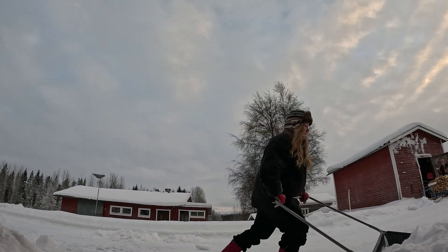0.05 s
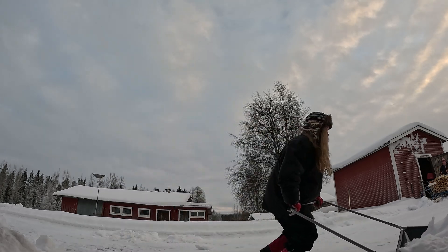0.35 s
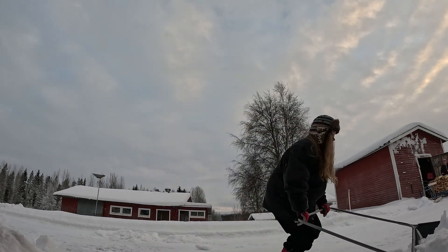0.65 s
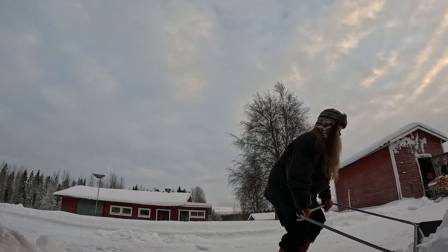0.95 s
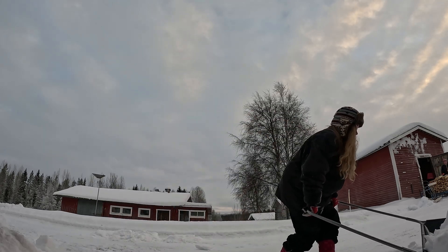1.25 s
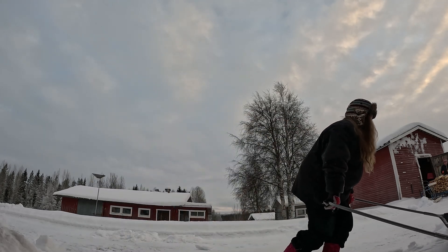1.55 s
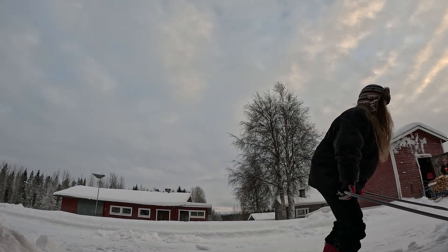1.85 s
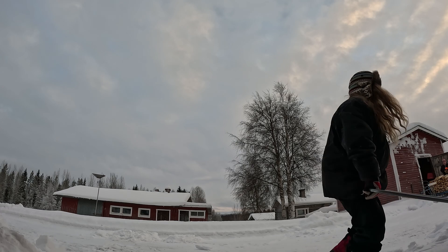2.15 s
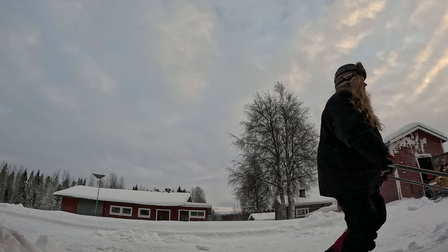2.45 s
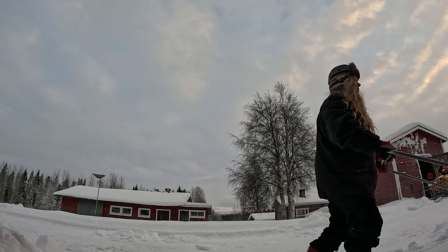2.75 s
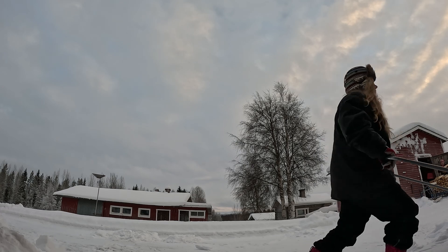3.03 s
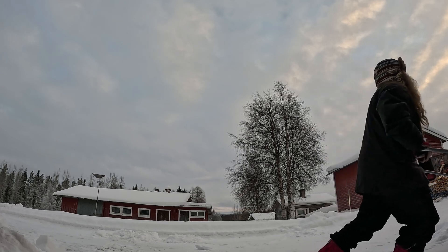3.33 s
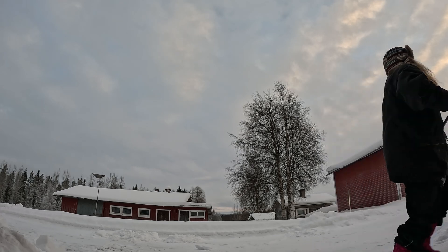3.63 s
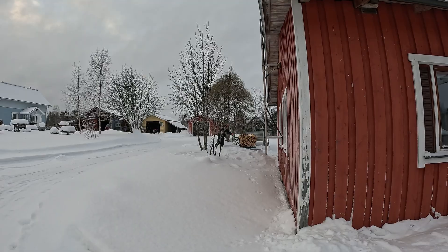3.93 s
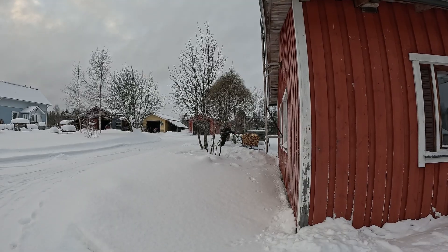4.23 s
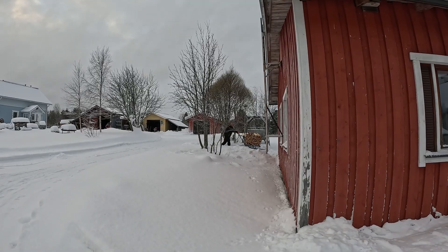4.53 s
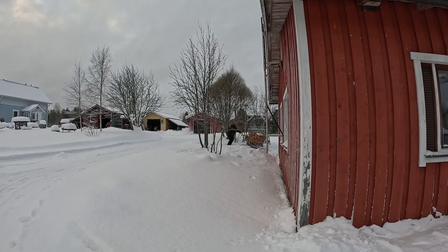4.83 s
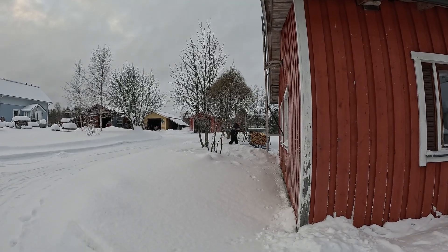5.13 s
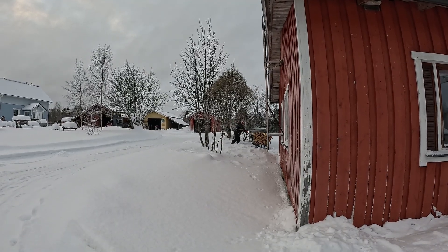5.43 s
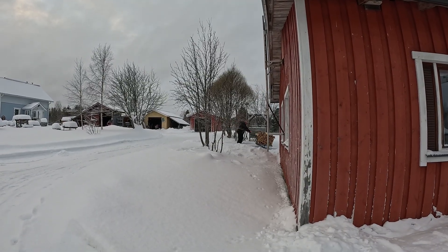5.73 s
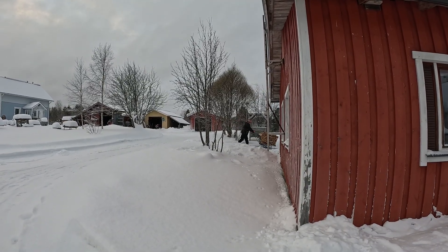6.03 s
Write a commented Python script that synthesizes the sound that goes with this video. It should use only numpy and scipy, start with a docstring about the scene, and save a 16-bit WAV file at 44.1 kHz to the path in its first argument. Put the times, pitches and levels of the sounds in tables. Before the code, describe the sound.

Close crunching shoves of a snow pusher with sharp knocks and boot thumps, then faint distant scraping and soft wind.

```python
"""In a snowy yard, a wide snow pusher is shoved over packed snow close by: it speeds up, then coasts.
With speed its edge crunches, its scoop rumbles and powder sprays. It bumps over lumps and knocks
against frozen ridges; its frame jolts once, boots thump in the snow and metal gives one small tink.
After a short, almost silent gap the pusher is far across the yard, a faint scrape under light wind
on the microphone."""
import sys
import numpy as np
from scipy import signal
from scipy.fft import rfft, irfft, next_fast_len
from scipy.io import wavfile
from scipy.ndimage import uniform_filter1d, map_coordinates

SR = 44100
rng = np.random.default_rng(int(sys.argv[2]) if len(sys.argv) > 2 else 0)


def int16_out(signal):
    """Quantize to a 16-bit WAV file."""
    q = np.round(np.clip(np.atleast_2d(signal).T, -1, 1) * 32767)
    wavfile.write(sys.argv[1], SR, q.astype(np.int16))


N = 276930

# the tones the blade rings with: (pitch [Hz], width [Hz], level [dB])
BLADE_TONES = [(597, 25, 1), (805, 66, 2), (978, 120, -3.5), (1173, 260, 0), (1598, 220, -1),
               (1800, 270, -2), (2500, 490, -6.5), (2950, 218, -1.5), (3680, 800, -16), (5110, 570, -6.5)]
# the hiss of spraying powder: (frequency [Hz], level [dB])
POWDER_COLOUR = [(7000, -41.5), (9500, -4.5), (11500, -4.5), (12500, -10.5), (13500, -22), (14400, -29)]
# the sound of cracking ice: (frequency [Hz], level [dB])
CRACK_COLOUR = [(150, -23), (500, 3.5), (1200, 2), (3000, -1), (6000, -7.5), (8500, -17.5), (11500, -14.5),
                (14000, -39)]
CATCH_S = 0.3763  # when the blade catches hard
FLEX_HZ = 299.2  # the scoop's thud on a ridge


def amp(db):
    """Turn decibels into a gain; amp(-60 * t / t60) fades by 60 dB in t60 seconds."""
    return 10 ** (np.asarray(db) / 20)


def unit(x):
    """Scale a signal to an average strength (rms) of 1."""
    return x / np.sqrt(np.mean(x ** 2) + 1e-20)


def colour(points):
    """A tone colour: gain at each frequency from (Hz, dB) points, falling steeply past both ends."""
    f, db = np.transpose(points)
    log_hz = np.log(np.r_[f[0] / 2, f, f[-1] * 2])
    return lambda hz: amp(np.interp(np.log(hz + 1), log_hz, np.r_[db[0] - 60, db, -120]))


def ringing(tones, hz):
    """How strongly a body with these ringing tones answers at each frequency."""
    return sum((-1) ** k * amp(db) * 1j * hz * width / (pitch ** 2 - hz ** 2 + 1j * hz * width)
               for k, (pitch, width, db) in enumerate(tones))


def curve(rows):
    """Join (time, value) points with straight lines, one value per sample."""
    return np.interp(np.arange(N) / SR, *np.transpose(rows))


def wobble(rate):
    """A smooth curve through `rate` random values a second."""
    return map_coordinates(rng.standard_normal(int(N * rate / SR) + 4), [np.arange(N) * rate / SR])


def filtered(x, response):
    """Turn each frequency of x up or down by response(hz)."""
    n = x.shape[-1]
    padded = next_fast_len(n + 8192)
    return irfft(rfft(x, padded) * response(np.fft.rfftfreq(padded, 1 / SR)), padded)[..., :n]


def add(track, s, sound):
    """Mix a sound into the track, starting at s seconds."""
    start = max(round(s * SR), 0)
    track[start:start + len(sound)] += sound[:N - start]


def noise(spectrum):
    """Steady noise with the given tone colour."""
    return unit(filtered(rng.standard_normal(N), colour(spectrum)))


def grains(spectrum, per_second, range_db):
    """A crunch made of countless tiny breaks of different sizes."""
    sizes = rng.standard_normal(N) * amp(-range_db * rng.random(N))
    breaks = rng.random(N) < per_second / SR
    return unit(filtered(sizes * breaks, colour(spectrum)))


def patchy(x, depth_db):
    """Narrow bands of the sound swell and fade at random as the contact shifts."""
    bands = signal.stft(x, nperseg=512)[2]
    swells = uniform_filter1d(rng.standard_normal(bands.shape), size=2, axis=0)
    swells = unit(uniform_filter1d(swells, size=16, axis=1))
    return unit(signal.istft(bands * amp(depth_db * swells), nperseg=512)[1][:N])


def shove(start, rise, hold, slowing_db_per_s):
    """Speed of one shove, 0 to 1: the pusher speeds up evenly, keeps its pace, then coasts."""
    t = np.arange(N) / SR - start
    return np.clip(t / rise, 0, 1) * amp(-slowing_db_per_s * np.maximum(t - rise - hold, 0))


def driven(shoves, layer_db, grows, creep_db=-22):
    """A layer gains `grows` dB for each dB of speed; between shoves the pusher still creeps."""
    speeds = np.maximum([shove(*row[:4]) for row in shoves], amp(creep_db))
    return np.max(amp(layer_db)[:, None] * speeds ** grows, axis=0)


def level_dip(length_s=0.0695, dip_db=8.5):
    """The scrape drops in level briefly after the frame's loud clack, in dB."""
    since_clack = np.arange(N) / SR - CATCH_S
    return -dip_db * np.interp(since_clack, [0, .008, length_s, length_s + .007], [0, 1, 1, 0])


def scrape():
    """The snow's crust breaks in clumps under the edge; every layer gets louder with speed."""
    # shoves close by: (start [s], rise [s], hold [s], slowing [dB/s],
    # edge [dB], drag [dB], rumble [dB], powder [dB])
    shoves = [(-0.2, 0.18, 0.058, 31, -32.5, -28.5, -30.5, -48),
              (0.12, 0.11, 0.13, 23.5, -35.5, -32.5, -29, -50), (1.16, 0.18, 0.1, 16, -31.5, -33, -32, -46),
              (1.807, 0.24, 0.14, 30.5, -30.5, -32, -31, -44.5),
              (2.656, .04, 0.037, 77.5, -38.5, -34, -36, -54.5),
              (3.023, 0.38, 0.06, 41, -31, -33, -32, -43.5),
              (3.731, 0.018, 0.032, 40, -31.5, -36.5, -37.5, -44)]
    # the crunch of the edge: (frequency [Hz], level [dB])
    edge_colour = [(710, -25), (1200, -1.5), (1370, -10.5), (1740, -3), (1910, -9.5), (3010, -2.5),
                   (4660, -4.5), (5070, -4), (7860, -13.5), (9000, -18), (11700, -40.5), (19800, -120)]
    # the gritty drag: (frequency [Hz], level [dB])
    drag_colour = [(260, -19.5), (450, 5), (684, -5), (877, 0.5), (1360, -8), (1460, -2.5), (1590, -18.5),
                   (2000, -6.5), (2600, -9.5), (4400, -120)]
    # the rumble of the scoop: (frequency [Hz], level [dB])
    rumble_colour = [(20, -35.5), (45, -12.5), (90, -5), (135, -3), (200, 0), (280, 2), (390, -1.5),
                     (520, -7.5), (700, -7.5), (1200, -49.5)]
    edge_db, drag_db, rumble_db, powder_db = np.transpose(shoves)[4:]
    judder = amp(0.61 * wobble(35) + 0.62 * wobble(220) + level_dip())
    crunch = grains(edge_colour, per_second=11000, range_db=2)
    edge = driven(shoves, edge_db, grows=0.9) * patchy(crunch, depth_db=1.3)
    # the drag partly rings the blade
    grit = grains(drag_colour, per_second=5500, range_db=14.5)
    taps = grains([(400, -7.5), (1500, 2), (3000, 0), (6000, -8)], per_second=5000, range_db=17)
    ring = unit(filtered(taps, lambda hz: ringing(BLADE_TONES, hz)))
    drag_gain = driven(shoves, drag_db, grows=0.97) * amp(0.77 * wobble(66))
    drag = drag_gain * patchy(grit + 0.5 * ring, depth_db=1.8)
    # the powder grows fastest with speed
    spray = grains(POWDER_COLOUR, per_second=6600, range_db=2)
    powder = driven(shoves, powder_db, grows=1.07) * patchy(spray, depth_db=2.8)
    # countless small lumps shake the scoop
    shaking = amp(1.8 * wobble(30)) * grains(rumble_colour, per_second=1100, range_db=4.5)
    rumble = driven(shoves, rumble_db, grows=0.8) * shaking
    return judder * (edge + drag + powder + rumble)


def thud(t, pitch_hz, swell=0.004):
    """The scoop flexes just after a blow; a lower thud lasts longer."""
    # the scoop's tones: (pitch [times pitch_hz], level [dB], fade time for a thud at FLEX_HZ [s])
    scoop_tones = [(1.026, 6, 0.039), (0.686, -7.5, 0.097), (1.14, -10, 0.13), (1.85, -11.5, 0.066)]
    age = t * pitch_hz / FLEX_HZ
    flex = sum(amp(db - 60 * age / t60) * np.sin(2 * np.pi * ratio * pitch_hz * t)
               for ratio, db, t60 in scoop_tones)
    return 1.73 * flex * (1 - np.exp(-(age / swell) ** 2))


def bumps(crush_t60=0.039):
    """Lumps of snow collapse under the blade and flex the scoop."""
    # the packed lumps: (time [s], level [dB], pitch [Hz])
    lumps = [(0.299, -18.5, 413), (0.412, -23.5, 284), (0.517, -29, 380), (0.646, -18.5, 366),
             (0.913, -38, 270), (0.788, -26, 423), (0.837, -29, 440), (1.17, -25, 327), (1.54, -18.5, 322),
             (1.659, -18.5, 225), (1.957, -27, 260), (2.011, -20, 291), (2.193, -22, 208),
             (2.268, -22, 403), (2.284, -22.5, 370), (2.582, -30, 467), (3.174, -28, 259),
             (3.349, -19.5, 313), (3.466, -22, 283), (3.567, -16, 211)]
    # a lump collapsing: (frequency [Hz], level [dB])
    crush_colour = [(130, -9), (220, 9.5), (420, -27), (680, 2.5), (900, -13), (1500, -24.5), (5000, -41)]
    track, t = np.zeros(N), np.arange(SR // 6) / SR
    crumbs = noise(crush_colour)
    collapse = amp(-60 * t / crush_t60) * (1 - np.exp(-t / 0.0016))
    for s, db, pitch_hz in lumps:
        # smaller lumps sound higher, and more of their sound is crumbling
        crush = collapse * (pitch_hz / 410) ** 2 * crumbs[round(s * SR):][:len(t)]
        add(track, s, amp(db) * (thud(t, pitch_hz, swell=0.0039) + crush))
    return track


def frame_jolt(level_db=-1.7, attack_s=0.000243):
    """The handle frame gives one hard, very short clack as the blade catches."""
    # the frame's tones: (pitch [Hz], level [dB], fade time [s])
    frame_tones = [(1450, -4, 0.014), (1760, 0.5, 0.017), (2800, -4, 0.0077), (2850, -5, 0.0099),
                   (7000, -33, .003)]
    track, t = np.zeros(N), np.arange(SR // 10) / SR
    ring = sum(amp(db - 60 * t / t60) * np.sin(2 * np.pi * hz * t) for hz, db, t60 in frame_tones)
    add(track, CATCH_S, amp(level_db) * ring * (1 - np.exp(-t / attack_s)))
    return track


def clack(t, t60, bright_hz, ring_gain, ring_hz=1181, spot_width_hz=380):
    """The edge shatters ice; the spot that is struck decides how much the blade's main tone rings."""
    fade = amp(-60 * t / t60)
    shatter = rng.standard_normal(len(t)) * fade
    # the briefer the contact, the more of it is one clean blow
    blow = min(0.0065 / t60, 3) * (np.arange(len(t)) == SR // 2000)
    force = shatter / np.linalg.norm(shatter) + blow
    spot = lambda hz: 1 + ring_gain * ringing([(ring_hz, spot_width_hz, 0)], hz)
    blade_and_ice = lambda hz: ringing(BLADE_TONES, hz) + 0.27 * colour(CRACK_COLOUR)(hz)
    body = filtered(force, lambda hz: blade_and_ice(hz) * spot(hz))
    softened = signal.sosfilt(signal.butter(4, bright_hz, fs=SR, output="sos"), body)
    ring = ring_gain * fade * np.sin(2 * np.pi * ring_hz * t) * (1 - np.exp(-t * ring_hz))
    return softened / np.linalg.norm(softened) * np.linalg.norm(fade) + ring


def knocks(pack_s=0.025, pack_rise_db=25, crumble_db_per_s=220):
    """Snow packs up just before each frozen ridge, then blade and scoop are struck."""
    # the edge meets ice: (time [s], clack [dB], thud [dB], clack fade time [s], brightness [Hz],
    # main ring [gain], crunch of packing snow [dB])
    ridges = [(0.377, -19, -20.5, 0.12, 3100, 0.28, -46), (0.450, -17.5, -21.5, 0.089, 3660, 0.68, -31),
              (0.949, -30, -26, 0.016, 3540, 0.26, -56), (0.987, -28, -29, .017, 8000, .2, -60),
              (1.093, -12, -14.5, 0.039, 6570, 1.16, -28), (1.144, -26.5, -30, 0.071, 3950, .3, -57),
              (1.630, -11, -9.5, 0.061, 4000, 1.2, -25.5), (2.466, -19.5, -10.5, 0.0085, 7000, .1, -60),
              (2.682, -12.5, -13, 0.085, 6760, 0.56, -23.5), (2.724, -28, -22.5, 0.055, 6040, 0.16, -59.5),
              (2.826, -33, -31, .03, 4950, .1, -47.5), (2.898, -23.5, -30, 0.02, 4930, .1, -41.5),
              (3.551, -8, -10.5, .062, 6920, 0.14, -33)]
    track, t = np.zeros(N), np.arange(SR // 4) / SR
    crunch = grains(CRACK_COLOUR, per_second=9000, range_db=10)
    packing = amp(np.minimum(pack_rise_db * (t / pack_s - 1), -crumble_db_per_s * (t - pack_s)))
    for s, clack_db, thud_db, t60, bright_hz, ring_gain, crunch_db in ridges:
        add(track, s - pack_s, amp(crunch_db) * packing * crunch[round(s * SR):][:len(t)])
        add(track, s, amp(clack_db) * clack(t, t60, bright_hz, ring_gain))
        add(track, s, amp(thud_db) * thud(t, FLEX_HZ))
    return track


def thumps(rows):
    """Dull pushes of a boot or of air, each dying away within a few swings."""
    track, t = np.zeros(N), np.arange(SR // 6) / SR
    for s, db, hz in rows:
        add(track, s, amp(db) * t * hz * np.exp(1 - 1.3 * t * hz) * np.sin(2 * np.pi * hz * t))
    return track


def footsteps():
    """Boots land in the snow with low thumps."""
    # each landing: (time [s], level [dB], pitch [Hz])
    steps = [(0.51, -27, 149), (0.700, -24, 115), (0.732, -29, 101), (1.353, -25.5, 88), (2.087, -22, 99),
             (3.380, -24, 106)]
    return thumps(steps)


def tink(start_s=3.0, level_db=-43, t60=0.12):
    """Metal gives one small, very high ring."""
    track, t = np.zeros(N), np.arange(SR // 4) / SR
    ring = noise([(7000, -8.5), (9000, -18.5), (10100, 2), (11000, -2.5), (12400, -15), (13500, -11)])
    add(track, start_s, amp(level_db - 60 * t / t60) * ring[:len(t)])
    return track


def far_pusher(tick_s=4.992, tick_db=-43.5, tick_t60=0.095):
    """Each distant shove rasps, hisses and rings the hollow scoop, which ticks once on a lump."""
    # shoves across the yard: (start [s], rise [s], hold [s], slowing [dB/s],
    # rasp [dB], hollow ring [dB], hiss [dB])
    shoves = [(3.857, 0.054, 0.057, 33, -49, -48, -57.5), (4.094, 0.11, 0.4, 93, -46.5, -44, -56),
              (4.67, .04, .01, 91, -52.5, -53, -62), (4.726, 0.098, 0.092, 25, -53, -59.5, -64),
              (5.148, 0.1, 0.11, 26.5, -55.5, -70, -57.5), (5.36, .2, 0.19, 47, -52.5, -61.5, -54),
              (5.937, 0.15, 0.11, 30, -53.5, -78, -54.5)]
    # the scoop's hollow ring: (pitch [Hz], width [Hz], level [dB])
    hollow_tones = [(724, 146, 1), (880, 127, 0.5), (1165, 130, -2.5), (1540, 92, 2.5), (1740, 120, -7.5)]
    # the distant rasp: (frequency [Hz], level [dB])
    rasp_colour = [(1300, 2), (1900, 1), (2300, 4), (2600, 1), (2900, 1), (3300, 1.5), (3900, -2.5),
                   (4500, -15), (7000, -45), (11000, -25), (13000, -45)]
    # the distant hiss: (frequency [Hz], level [dB])
    hiss_colour = [(300, 7.5), (600, 0.5), (1000, 4), (3500, -1), (4600, 2.5), (6300, -0.5), (7600, -8),
                   (8600, -24), (10500, -40), (12000, -17), (13300, -38)]
    rasp_db, hollow_db, hiss_db = np.transpose(shoves)[4:]
    scoop = filtered(rng.standard_normal(N), lambda hz: ringing(hollow_tones, hz))
    # the hollow ring needs pressure, so it dies first
    hollow = driven(shoves, hollow_db, grows=1.4) * patchy(scoop, depth_db=4)
    grit = grains(rasp_colour, per_second=8000, range_db=1)
    rasp = driven(shoves, rasp_db, grows=0.57) * patchy(grit, depth_db=3.5)
    hiss_gain = driven(shoves, hiss_db, grows=0.33) * amp(0.62 * wobble(40))
    hiss = hiss_gain * patchy(noise(hiss_colour), depth_db=1)
    t = np.arange(SR // 8) / SR
    tick = noise([(1100, -17), (1500, 0), (1900, -3), (2400, -16)])[:len(t)]
    add(hollow, tick_s, amp(tick_db - 60 * t / tick_t60) * (1 - np.exp(-t / .003)) * tick)
    return amp(1.3 * wobble(35)) * (hollow + rasp) + hiss


def wind(flutter_db=2.0, deep_db=-55, low_hz=150, usual_db=-42, brightens=0.17):
    """Light gusts flutter on the microphone, brighter when stronger, over a deep outdoor rumble."""
    # the strength of the gusts: (time [s], level [dB])
    gust_levels = [(3.97, -34.5), (4.05, -34.5), (4.17, -40), (4.26, -37), (4.7, -46.5), (5.11, -44.5),
                   (5.16, -64), (5.23, -60.5), (5.25, -52), (5.54, -49), (5.76, -61), (5.88, -51),
                   (6.0, -58), (6.03, -46), (6.13, -61), (6.16, -47.5), (6.21, -51.5), (6.28, -67)]
    # air rushing over the microphone: (frequency [Hz], level [dB])
    air_colour = [(25, -22), (55, -7), (100, -0.5), (160, -1.5), (215, -2), (310, -10), (430, -18),
                  (600, -24.5)]
    # soft bumps of air on the microphone: (time [s], level [dB], pitch [Hz])
    puffs = [(4.262, -24, 185), (4.383, -26, 170), (5.1, -31, 173), (6.165, -35, 70.6)]
    # the outdoor rumble: (frequency [Hz], level [dB])
    deep_colour = [(22, -8), (45, -5), (75, 3.5), (115, -0.5), (200, -6)]
    gust_db = curve(gust_levels)
    air = unit(amp(flutter_db * wobble(24)) * noise(air_colour))
    low = filtered(air, lambda hz: 1 / (1 + (hz / low_hz) ** 4))
    high = amp(brightens * (gust_db - usual_db)) * (air - low)
    rumble = amp(deep_db + 3.3 * wobble(5.1)) * noise(deep_colour)
    return amp(gust_db) * (low + high) + thumps(puffs) + rumble


def scene(switch_s=3.86):
    """The near scene fades out and the far one fades in; a faint stereo noise follows the high hiss."""
    # the fade out and back in: (time [s], level [dB])
    fade = [(3.785, -1), (3.797, -38), (3.83, -61), (3.89, -62), (3.915, -27), (3.945, -4), (3.98, -1)]
    # the stereo noise, low to high and strongest near 12 kHz: (frequency [Hz], level [dB])
    side_colour = [(100, -7.5), (2000, -24.5), (8000, -16.5), (10500, -11), (12000, 9), (14000, -14)]
    close_by = scrape() + bumps() + frame_jolt() + knocks() + footsteps() + tink()
    far_away = far_pusher() + wind()
    middle = np.where(np.arange(N) / SR < switch_s, close_by, far_away) * amp(curve(fade))
    high_hiss = filtered(middle, colour(POWDER_COLOUR))
    side = filtered(high_hiss * rng.standard_normal(N), colour(side_colour))
    return np.array([middle + side, middle - side])


def record(dry, ceiling=0.95, notch_hz=9100, top_hz=14400):
    """Peaks are rounded off, the microphone's opening swallows one high band, and the very top is cut."""
    rounded = dry / (1 + (np.abs(dry) / ceiling) ** 6) ** (1 / 6)
    notch = lambda hz: np.abs(hz - notch_hz) / np.hypot(hz - notch_hz, 380)
    return filtered(rounded, lambda hz: notch(hz) * (hz < top_hz))


dry = scene()
out = record(dry)
int16_out(out)
```